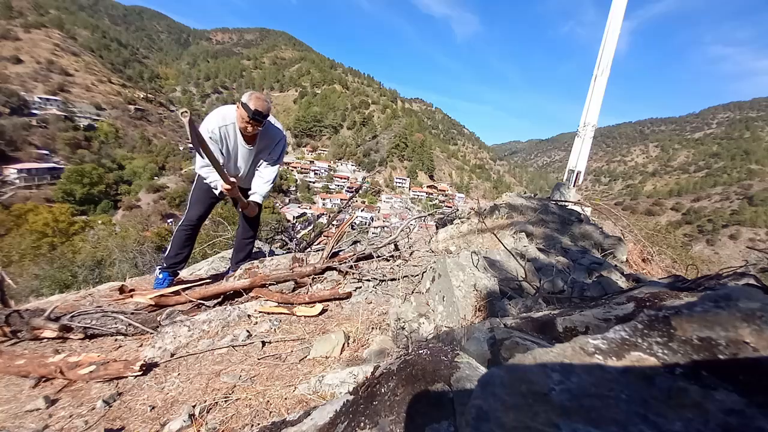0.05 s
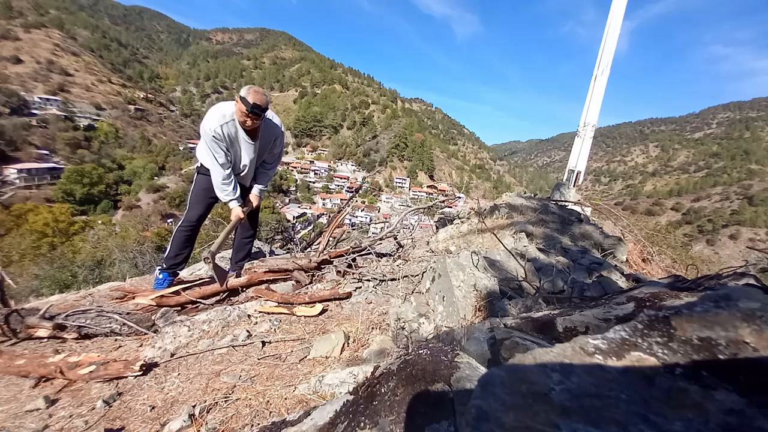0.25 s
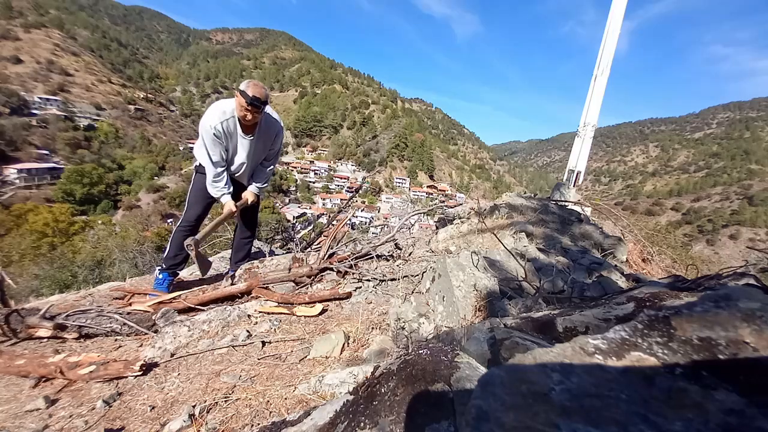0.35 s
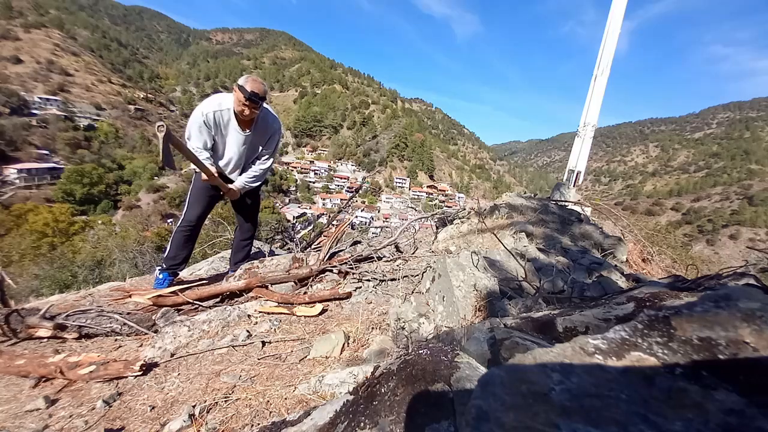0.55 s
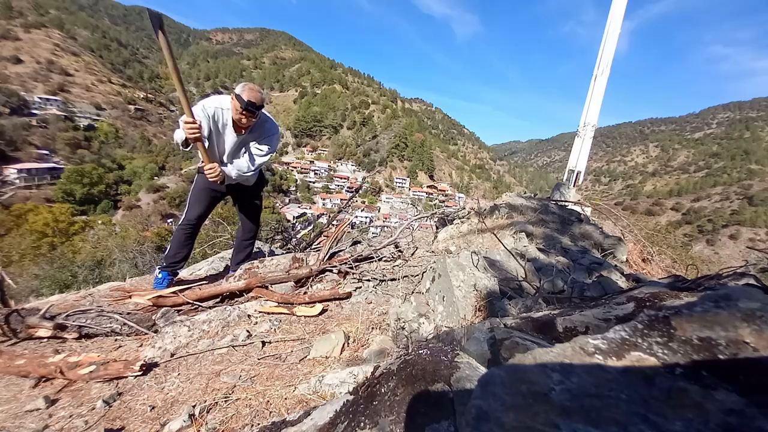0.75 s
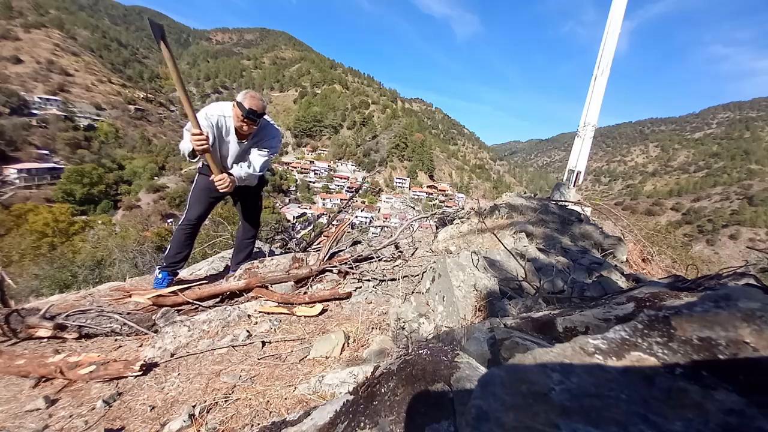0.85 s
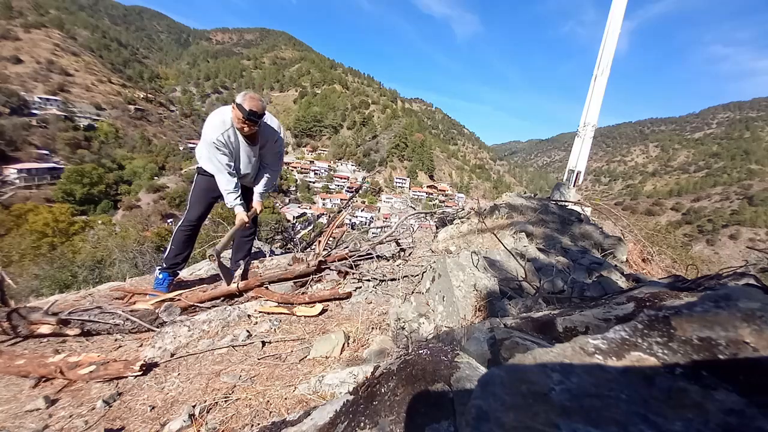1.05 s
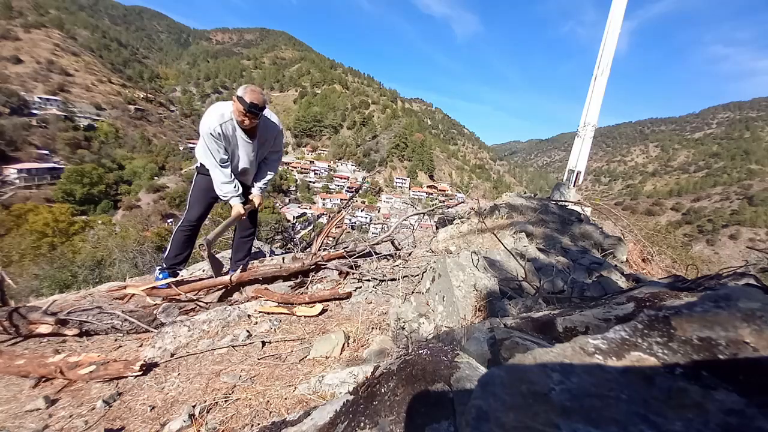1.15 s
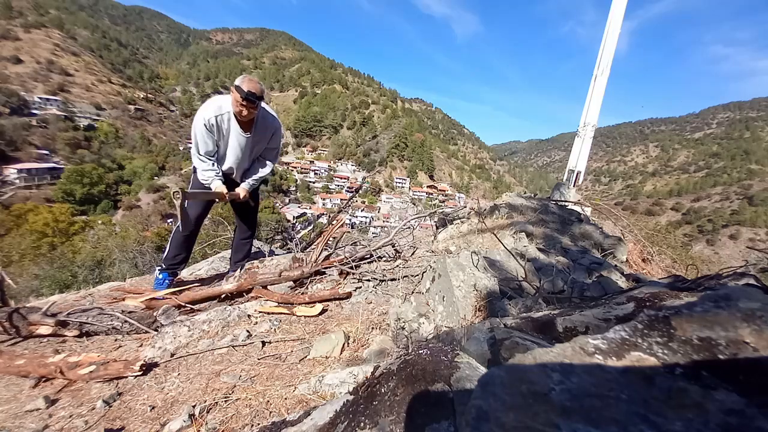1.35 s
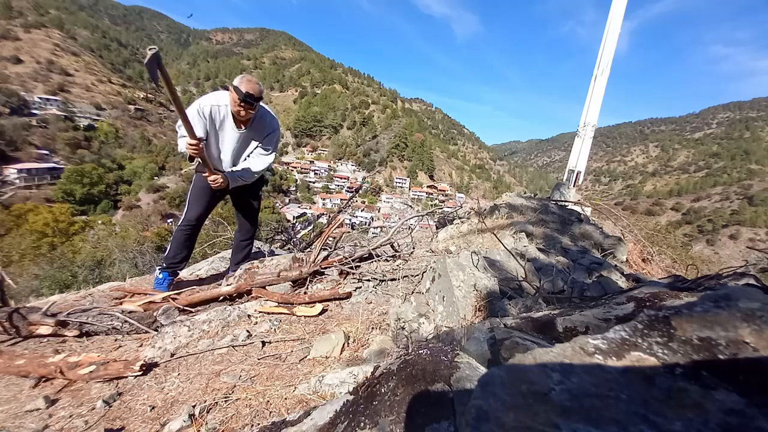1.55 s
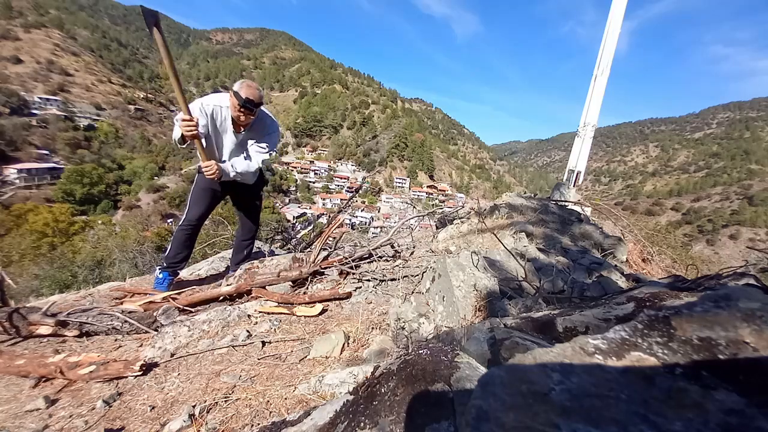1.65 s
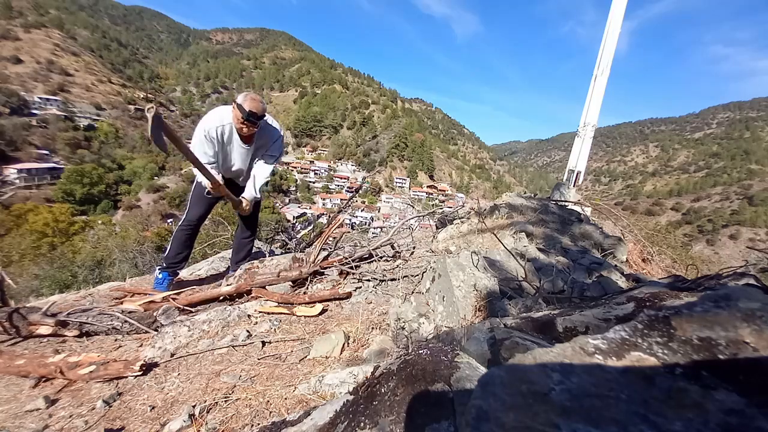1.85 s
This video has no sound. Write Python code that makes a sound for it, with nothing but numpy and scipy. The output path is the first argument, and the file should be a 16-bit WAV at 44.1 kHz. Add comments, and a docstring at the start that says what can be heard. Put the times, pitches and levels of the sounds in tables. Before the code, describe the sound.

A mattock chops a dry log twice on a stony hillside, each sharp crack bringing a short woody thud, low shudder and spray of grit and pebbles; close stereo, open air, no echo.

```python
"""Mattock on a dry log

A heavy mattock strikes a dry log on stony ground twice, outdoors on a hillside.
Each blow is noise cracks, struck log modes and a faint blade ring; the log's shudder is low noise and a hum.
Grit is coloured random clicks, twigs are noise bursts, stones and knocks are decaying sines.
A small stereo recorder ducks its gain just ahead of each blow."""
import sys
import numpy as np
from scipy import signal
from scipy.fft import rfft, irfft
from scipy.io import wavfile
from scipy.ndimage import uniform_filter1d, minimum_filter1d

SR = 44100
rng = np.random.default_rng(int(sys.argv[2]) if len(sys.argv) > 2 else 0)


def int16_out(signal):
    """Quantize to a 16-bit WAV file."""
    q = np.round(np.clip(np.atleast_2d(signal).T, -1, 1) * 32767)
    wavfile.write(sys.argv[1], SR, q.astype(np.int16))


def rack_gain(trim_db):
    """Turn a fader trim in dB into the linear factor to multiply a signal by."""
    fader = np.asarray(trim_db, float)
    return 10 ** (fader / 20)


N = 83790

# Contacts within the two blows, as blade bites and wood splits. Each row: start in seconds, crack in dB, thud in dB.
BLOW_CONTACTS = [(0.2232, 5.5, 14), (0.226, 9, 4), (.232, 11, 7.5), (.2372, -1, -8), (0.2397, 4.5, 6.5),
                 (1.1109, 9, 12), (1.1144, 3.5, -9)]
# Crack spectrum. Each row: frequency in Hz, relative density in dB per Hz.
CRUNCH_SPECTRUM = [(410, -10.5), (1800, -1.5), (4500, -7.5), (8200, -12.5), (10000, -19.5), (13000, -13),
                   (16000, -23.5)]
# Struck log modes. Each row: frequency in Hz, relative level in dB, T60 in seconds.
LOG_MODES = [(410, -18, 0.02), (485, -3, 0.024), (558, -14.5, 0.078), (637, -4, 0.022), (857, -5, 0.017)]
# Blade modes. Each row: frequency in Hz, relative level in dB, T60 in seconds.
BLADE_MODES = [(1740, -11, 0.047), (3774, -29, 0.37)]
CRACK_T60_S, CRACKS_PER_S, CRACK_SPREAD_DB = 0.017, 17000, 2
THUD_LATE_S, BLOW_LAG_S = 0.00123, 0.00017   # thud after crack; right side after left

# Dry twigs and grit landing. Each row: start in seconds, level in dB.
SNAPS = [(0.0152, -33), (0.0264, -33.5), (0.052, -30), (.183, -36), (.5731, -32), (0.6802, -31),
         (1.0156, -45), (1.29, -22), (1.332, -21.5), (1.378, -26), (1.3955, -20.5), (1.4052, -26.5),
         (1.4536, -32.5), (1.511, -28), (1.5728, -32), (1.6642, -30.5), (1.7195, -41), (1.734, -33.5),
         (1.8423, -37)]
# Stones clattering together. Each row: start in seconds, level in dB, ring in Hz.
CLINKS = [(0.1142, -36.5, 3360), (0.258, -15, 2160), (0.309, -17, 4780), (0.335, -24.5, 3680),
          (.3465, -15.5, 1867), (0.4889, -25, 3700), (0.6572, -29, 2440), (0.9016, -36.5, 1930),
          (1.116, -2, 2650), (1.2084, -23.5, 1970), (1.3309, -29, 1880), (1.345, -26.5, 3720),
          (1.358, -30.5, 3880), (1.378, -34, 3430)]
# Dull knocks of the log on the ground. Each row: start in seconds, level in dB, ring in Hz.
KNOCKS = [(.669, -27.5, 536), (1.235, -32, 117), (1.289, -29.5, 154), (1.453, -35.5, 262), (1.535, -36, 95)]
RISE_S, SNAP_T60_S, SNAP_TILT_DB_PER_DECADE = 0.00038, 0.039, 7.5
CHATTER_T60_S, CLINK_T60_S, BOUNCE_CYCLES = 0.038, 0.024, 3.96
CLACK_DB, CLACK_T60_S, CLACK_PITCH_RATIO = 3.5, 0.0009, 1.34   # level and pitch relative to the ring
KNOCK_T60_CYCLES, KNOCK_UNDERTONE_RATIO = 8.9, 0.89

# Shudder and rocking of the log. Each row: time in seconds, level in dB.
SHUDDER_LEVEL = [(0, -48), (.222, -52), (.24, -12), (.35, -30), (.5, -37.5), (.8, -47), (1.109, -52.5),
                 (1.122, -11), (1.2, -30.5), (1.35, -42.5), (1.45, -34.5), (1.6, -49), (1.9, -49)]
# Rumble spectrum. Each row: frequency in Hz, relative density in dB per Hz.
RUMBLE_SPECTRUM = [(20, -30), (40, -18), (76, -1.5), (150, -1), (217, 0), (548, -6.5), (1300, -32.5)]
# The log's lowest mode, one list per blow. Each row: time in seconds, rms level in dB.
HUM_LEVELS = [
    [(.245, -14), (.335, -21), (.42, -42.5)],
    [(1.13, -27), (1.155, -21), (1.24, -46)],
]
LUMP_DB, LUMP_HZ = 1.9, 11.0
HUM_HZ, HUM_SAG_HZ_PER_S, HUM_FADE_S = 242.2, 120, 0.018
WAVER_RMS_HZ, WAVER_RATE_HZ = 3.4, 29.0

# Grit and twigs in motion, from before and after each blow. Each row: time in seconds, level in dB.
SCATTER_LEVEL = [(0, -40), (.1, -45), (.222, -55), (.224, -12.5), (.27, -18.5), (.35, -27), (.45, -30),
                 (.8, -43), (.98, -49.5), (1.109, -59), (1.112, -11.5), (1.15, -17), (1.22, -28.5),
                 (1.3, -36), (1.45, -36.5), (1.6, -42), (1.8, -46.5), (1.9, -57.5)]
# Grit spectrum. Each row: frequency in Hz, relative density in dB per Hz.
GRIT_SPECTRUM = [(290, -101), (500, -2), (1160, -7.5), (1840, -3), (2930, -6.5), (3650, -4), (9490, -17.5),
                 (15600, -11), (16300, -20)]
GRAINS_PER_S, GRAIN_SPREAD_DB, COARSEST_HZ = 7000, 1.5, 710
CLUMP_HZ, SHARED_CLUMP_DB, OWN_CLUMP_DB = 74, 1.92, 2
PEBBLES_PER_S, PEBBLE_SPREAD_DB, PEBBLE_DB, PEBBLE_T60_CYCLES = 300, 3.2, -5, 61

# Stereo likeness. Each row: frequency in Hz, left-right correlation from -1 to 1, before the phase turn.
LIKENESS = [(60, 0.95), (300, 0.71), (700, 0.97), (1100, 0.22), (4500, 0.32), (12000, 0.16)]
# Stereo balance. Each row: frequency in Hz, left over right in dB.
LEFT_LEAN = [(60, 4), (1000, 2), (4500, 0.5), (7700, 13), (9600, 7.5), (12500, 3.5)]
RIGHT_TURN_RAD = 0.42

BASS_CUT_HZ, TOP_CUT_HZ = 87, 16400
CEILING_DB, LOOK_AHEAD_S, RECOVER_DB_PER_S = 2.5, 0.011, 181.5


def rms_one(x):
    """Scale to rms 1."""
    return x / np.sqrt(np.mean(x ** 2) + 1e-20)


def level(rows):
    """Gain over time, interpolated in dB."""
    return rack_gain(np.interp(np.arange(N) / SR, *np.transpose(rows)))


def at_hz(points, hz):
    """Read a spectrum on a log-frequency axis."""
    point_hz, values = np.transpose(points)
    return np.interp(np.log(hz + 1), np.log(point_hz), values)


def colour(x, spectrum):
    """Filter to a spectrum, keeping the power of white noise."""
    gain = rack_gain(at_hz(spectrum, np.fft.rfftfreq(N, 1 / SR)))
    return irfft(rfft(x) * rms_one(gain), N)


def drift(rate_hz):
    """Slow random wander: two-pole lowpass noise of rms 1."""
    pole = np.exp(-2 * np.pi * rate_hz / SR)
    noise = rng.standard_normal(N + SR)
    return rms_one(signal.lfilter([1], [1, -2 * pole, pole * pole], noise)[SR:])


def click(s, db):
    """One impulse."""
    out = np.zeros(N)
    out[int(s * SR)] = rack_gain(db)
    return out


def ring(clicks, hz, t60_s):
    """Damped resonator: a unit click starts a sine of height 1."""
    radius, turn = rack_gain(-60 / (t60_s * SR)), 2 * np.pi * hz / SR
    feedback = [1, -2 * radius * np.cos(turn), radius * radius]
    return signal.lfilter([0, np.sin(turn)], feedback, clicks + 1e-18)


def grains(per_s, spread_db):
    """Two streams of random clicks of uneven size, rms 1 overall."""
    sizes = rack_gain(spread_db * np.minimum(rng.exponential(1, (2, N)), 5))
    signs = rng.choice([-1, 1], (2, N))
    return rms_one(sizes * signs * (rng.random((2, N)) < per_s / SR))


def spread(pair, lag_s=0):
    """Mix a mid and a side stream to the set likeness and balance; turn and delay the right."""
    hz = np.fft.rfftfreq(N, 1 / SR)
    alike = np.clip(at_hz(LIKENESS, hz), -1, 1)
    half_lean_db = at_hz(LEFT_LEAN, hz) / 2
    mid, side = rfft(pair) * np.sqrt([1 + alike, 1 - alike]) / np.sqrt(2)
    left = (mid + side) * rack_gain(half_lean_db)
    turn = np.exp(-1j * (RIGHT_TURN_RAD + 2 * np.pi * hz * lag_s))
    right = (mid - side) * rack_gain(-half_lean_db) * turn
    return irfft([left, right], N)


def blows():
    """Each contact bursts into cracks, strikes the log's modes and sets the blade ringing."""
    t = np.arange(N) / SR
    crack_gain = sum(rack_gain(crack_db - 60 * np.clip(t - s, 0, 1) / CRACK_T60_S) * (t >= s)
                     for s, crack_db, _ in BLOW_CONTACTS)
    push = sum(click(s + THUD_LATE_S, thud_db) for s, _, thud_db in BLOW_CONTACTS)
    body = sum(rack_gain(db) * ring(push, hz, t60_s) for hz, db, t60_s in LOG_MODES + BLADE_MODES)
    pair = crack_gain * colour(grains(CRACKS_PER_S, CRACK_SPREAD_DB), CRUNCH_SPECTRUM)
    pair[0] += body
    return spread(pair, BLOW_LAG_S)


def fall(s, db, t60_s):
    """Envelope of a landing: quick rise, then even decay in dB."""
    age = np.arange(N) / SR - s
    return rack_gain(db - 60 * np.clip(age, 0, 1) / t60_s) * np.clip(age / RISE_S, 0, 1)


def snaps():
    """Small dry bits land as dying sprays of bright noise, some thinner than others."""
    bright = [(hz, db + SNAP_TILT_DB_PER_DECADE * np.log10(hz)) for hz, db in GRIT_SPECTRUM]
    noise = colour(rng.standard_normal((2, N)), bright)
    thin = rms_one(np.gradient(noise, axis=1))   # smaller bits sound thinner
    out = np.zeros((2, N))
    for s, db in SNAPS:
        blend = rng.random() * np.pi / 2
        out += fall(s, db, SNAP_T60_S) * (np.cos(blend) * noise + np.sin(blend) * thin)
    return spread(out)


def clinks():
    """Stones chatter in a broad, dull clack; a touch and a bounce ring one stone."""
    chatter, out = rng.standard_normal((2, N)), np.zeros((2, N))
    for s, db, hz in CLINKS:
        hits = fall(s, 0, CHATTER_T60_S) * chatter
        clack = ring(hits, hz * CLACK_PITCH_RATIO, CLACK_T60_S)
        out += rack_gain(db + CLACK_DB) * clack / np.abs(clack).max()
        touches = click(s, db) + click(s + BOUNCE_CYCLES / hz, db)
        out[0] += ring(touches, hz, CLINK_T60_S)
    return spread(out)


def knocks():
    """The log knocks on the ground: a dull pair of close, short rings, centred."""
    out = np.zeros(N)
    for s, db, hz in KNOCKS:
        for ring_hz in (hz, hz * KNOCK_UNDERTONE_RATIO):
            out += ring(click(s, db), ring_hz, KNOCK_T60_CYCLES / hz)
    return out


def shudder():
    """The rocking log rumbles as low noise of uneven level."""
    rumble = colour(rng.standard_normal((2, N)), RUMBLE_SPECTRUM)
    return level(SHUDDER_LEVEL) * spread(rumble * rack_gain(LUMP_DB * drift(LUMP_HZ)))


def hum():
    """The log's lowest mode sings after each blow, sagging in pitch as the shaking eases."""
    t, out, waver_hz = np.arange(N) / SR, np.zeros(N), WAVER_RMS_HZ * drift(WAVER_RATE_HZ)
    for rows in HUM_LEVELS:
        start, end = rows[0][0], rows[-1][0]
        hz = HUM_HZ - HUM_SAG_HZ_PER_S * (t - start) + waver_hz
        fade = np.clip(1 - np.maximum(start - t, t - end) / HUM_FADE_S, 0, 1)
        out += level(rows) * fade * np.sqrt(2) * np.sin(2 * np.pi * np.cumsum(hz) / SR)
    return out


def grit():
    """Grains hiss in clumps, coarse and fine bunching partly on their own."""
    hz = np.fft.rfftfreq(N, 1 / SR) + 1
    tone = rfft(colour(grains(GRAINS_PER_S, GRAIN_SPREAD_DB), GRIT_SPECTRUM))
    octave = np.clip(np.log2(hz / COARSEST_HZ), 0, 4)   # above the coarsest grains
    together, out = drift(CLUMP_HZ), np.zeros((2, N))
    for k in range(5):
        clump_db = SHARED_CLUMP_DB * together + OWN_CLUMP_DB * drift(CLUMP_HZ)
        band = np.clip(1 - abs(octave - k), 0, 1)
        out += rack_gain(clump_db) * irfft(tone * band, N)
    return out


def pebbles():
    """Now and then a grain rings as a pebble at one of 14 pitches."""
    hits, dealt = grains(PEBBLES_PER_S, PEBBLE_SPREAD_DB), rng.integers(0, 14, N)
    rings = sum(ring(hits * (dealt == k), hz, PEBBLE_T60_CYCLES / hz)
                for k, hz in enumerate(np.geomspace(1700, 7600, 14)))
    return rack_gain(PEBBLE_DB) * rms_one(rings)


def scatter():
    """Grit and ringing pebbles swell and settle together."""
    return level(SCATTER_LEVEL) * spread(grit() + pebbles())


def scene():
    """All layers, dry, in the open air."""
    return blows() + snaps() + clinks() + knocks() + shudder() + hum() + scatter()


def band_limit(x):
    """A steep low-pass at the top of the band."""
    return signal.sosfilt(signal.butter(12, 17010, fs=SR, output="sos"), x)


def record(dry):
    """Bass cut, look-ahead limiter with steady recovery, rounded peaks, top cut."""
    bass_cut = signal.butter(3, BASS_CUT_HZ, "high", fs=SR, output="sos")
    dry = signal.sosfilt(bass_cut, dry)
    ahead = int(LOOK_AHEAD_S * SR)
    recovery_db = RECOVER_DB_PER_S * np.arange(N) / SR
    over_db = np.maximum(20 * np.log10(np.abs(dry).max(axis=0) + 1e-9) - CEILING_DB, 0)
    held_db = np.maximum.accumulate(over_db + recovery_db) - recovery_db
    gain_db = uniform_filter1d(minimum_filter1d(-held_db, 2 * ahead + 1), ahead)
    rounded = np.tanh(dry * rack_gain(gain_db))
    top_cut = signal.cheby2(12, 60, TOP_CUT_HZ, fs=SR, output="sos")
    return band_limit(signal.sosfilt(top_cut, rounded))


dry = scene()
out = record(dry)
int16_out(out)
```